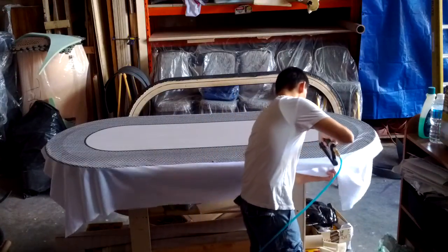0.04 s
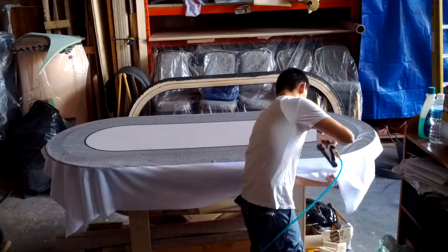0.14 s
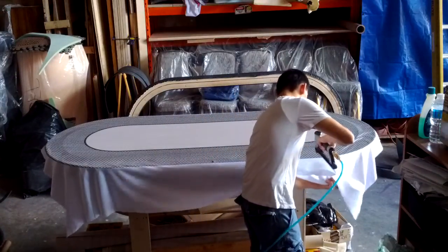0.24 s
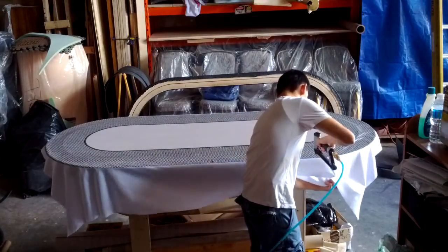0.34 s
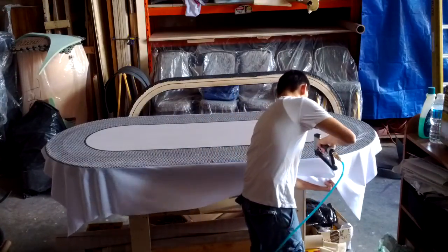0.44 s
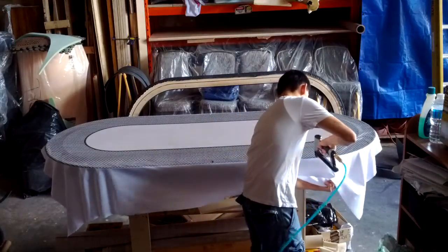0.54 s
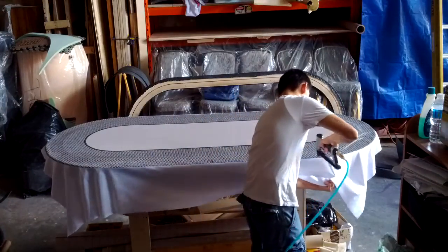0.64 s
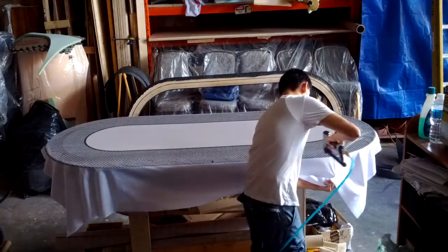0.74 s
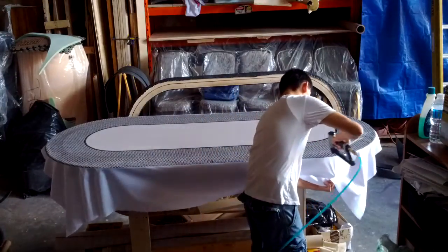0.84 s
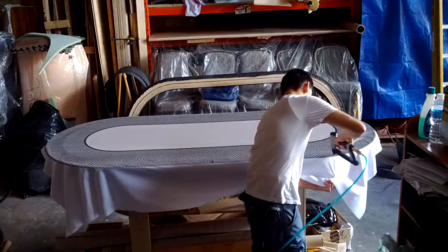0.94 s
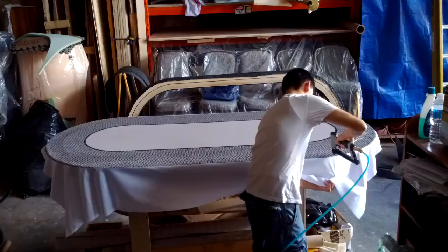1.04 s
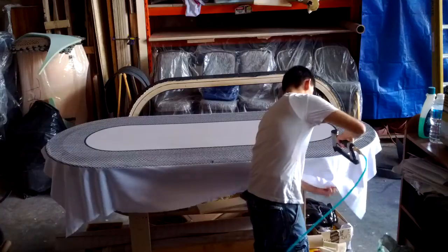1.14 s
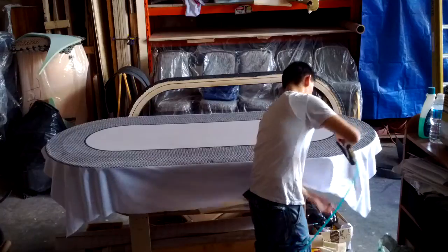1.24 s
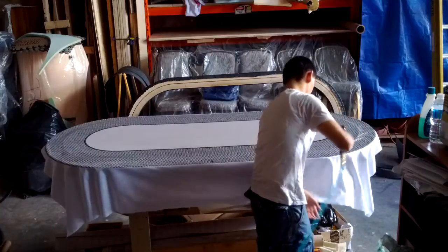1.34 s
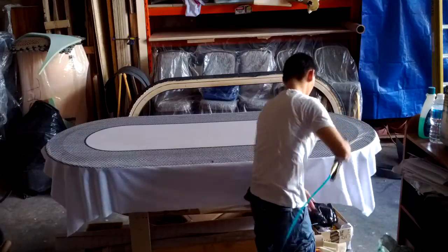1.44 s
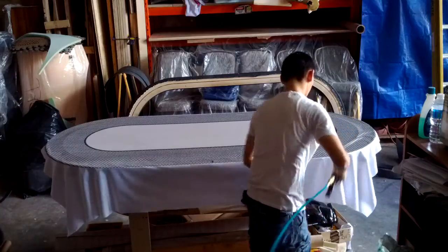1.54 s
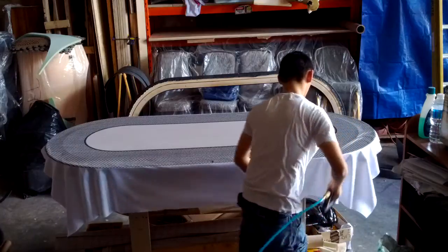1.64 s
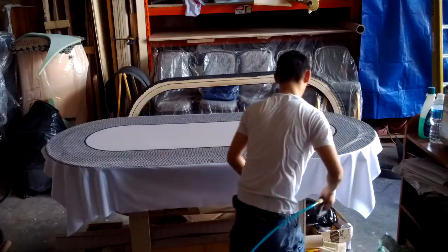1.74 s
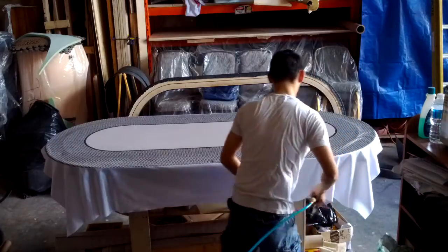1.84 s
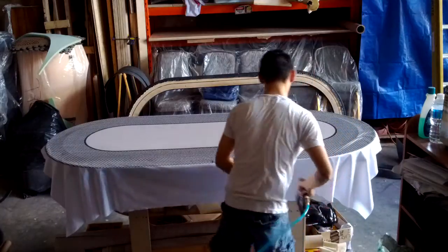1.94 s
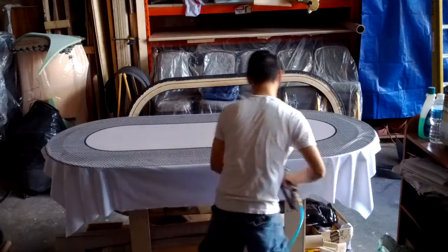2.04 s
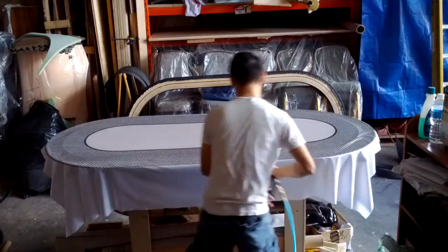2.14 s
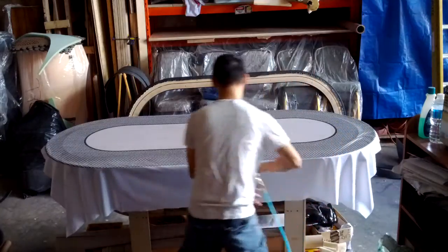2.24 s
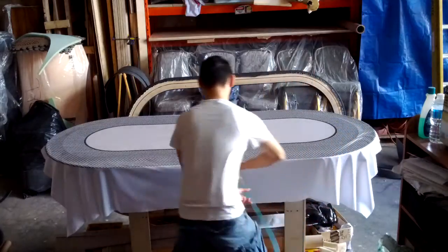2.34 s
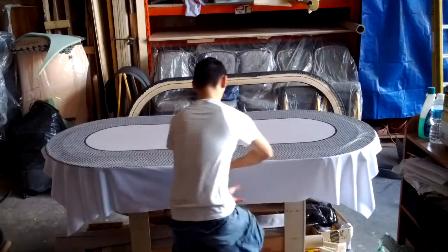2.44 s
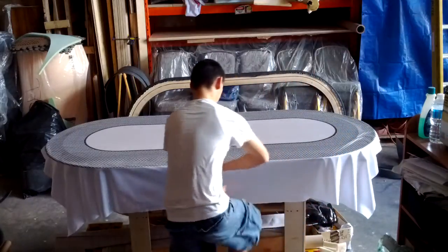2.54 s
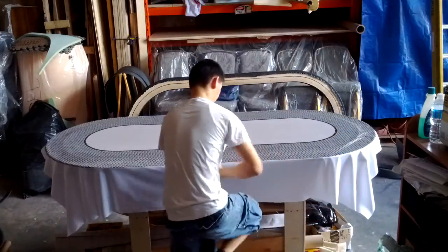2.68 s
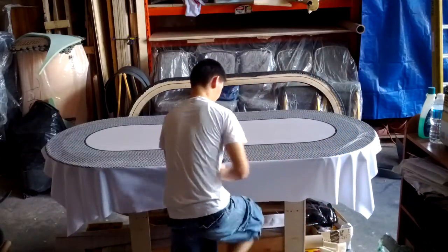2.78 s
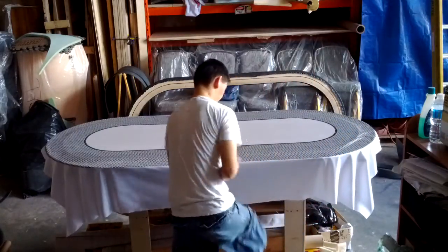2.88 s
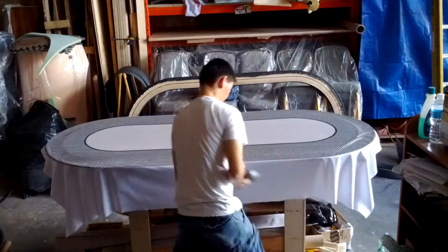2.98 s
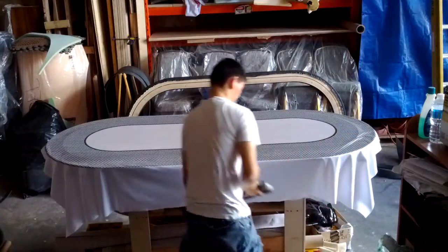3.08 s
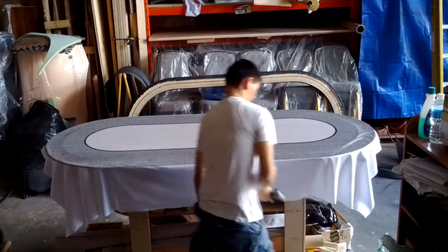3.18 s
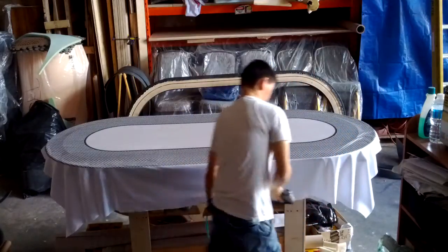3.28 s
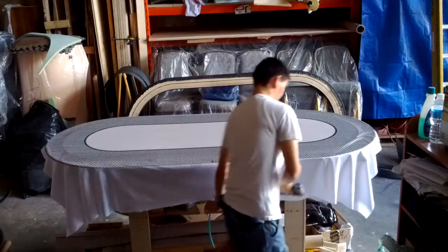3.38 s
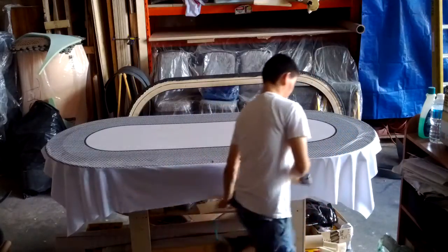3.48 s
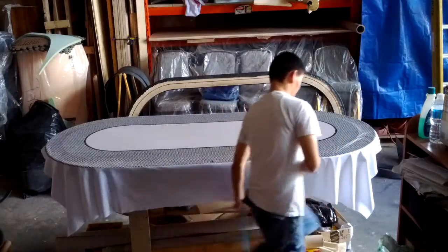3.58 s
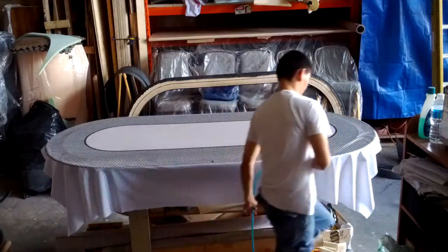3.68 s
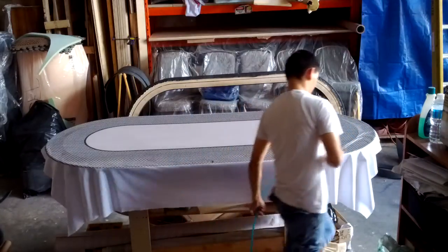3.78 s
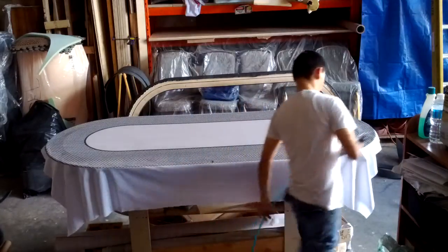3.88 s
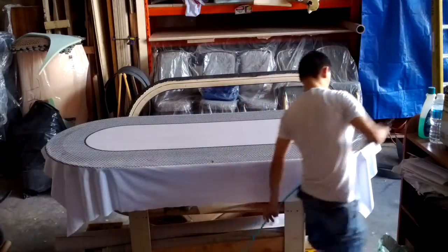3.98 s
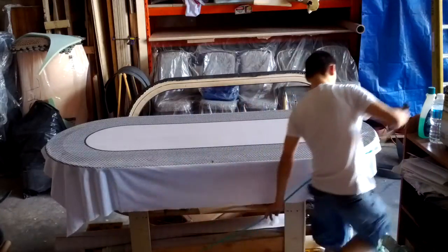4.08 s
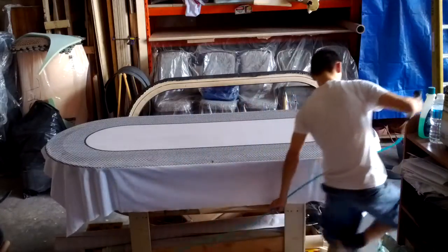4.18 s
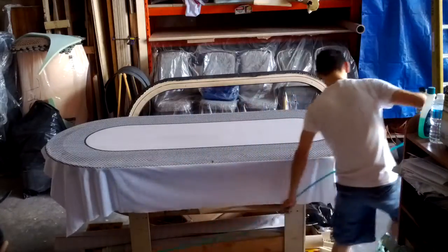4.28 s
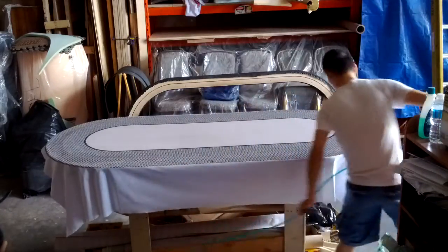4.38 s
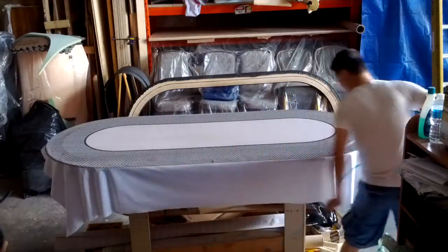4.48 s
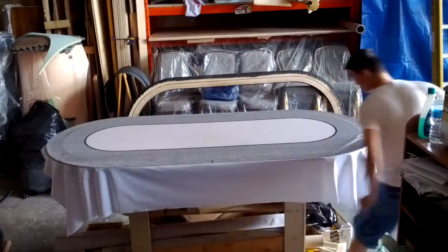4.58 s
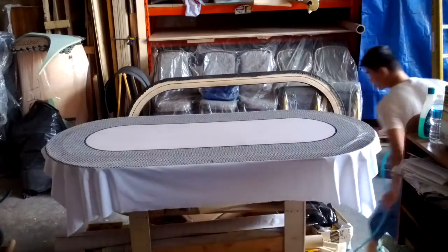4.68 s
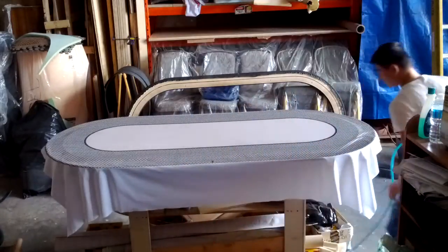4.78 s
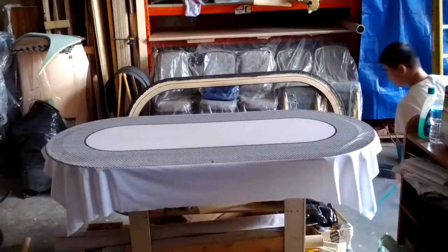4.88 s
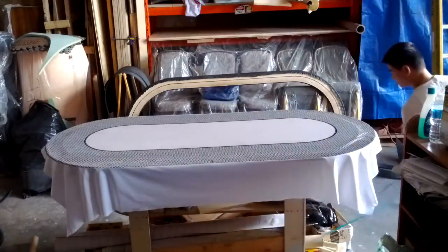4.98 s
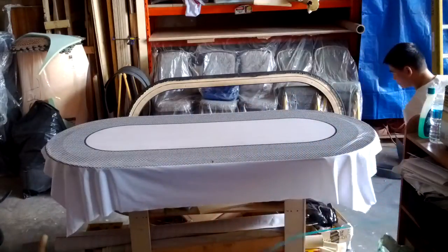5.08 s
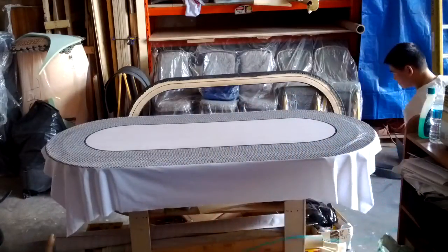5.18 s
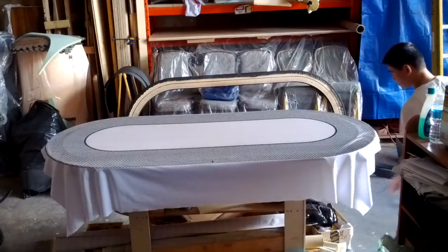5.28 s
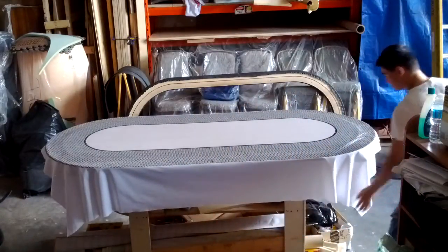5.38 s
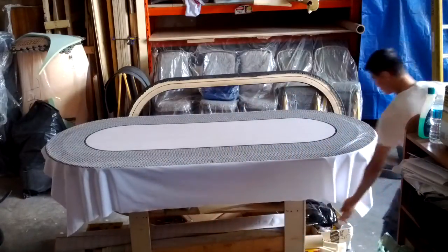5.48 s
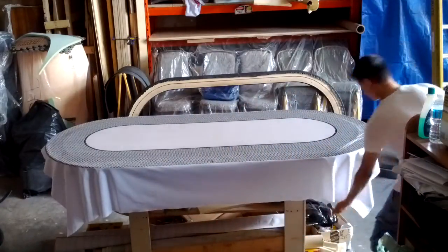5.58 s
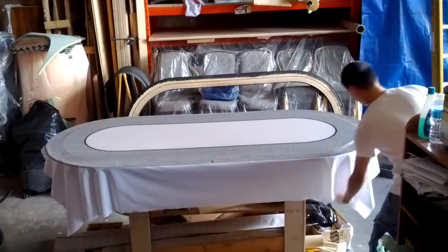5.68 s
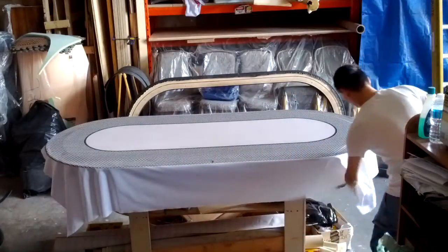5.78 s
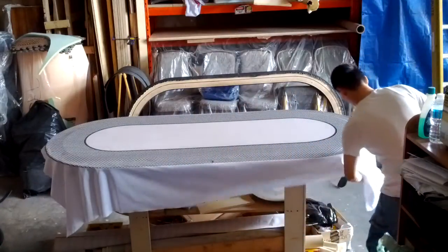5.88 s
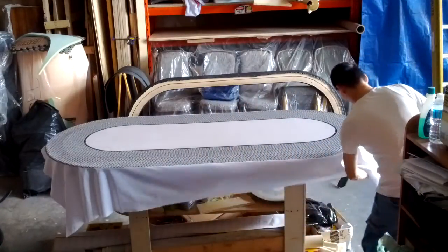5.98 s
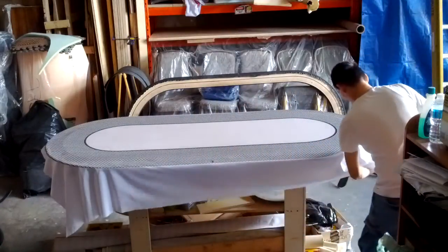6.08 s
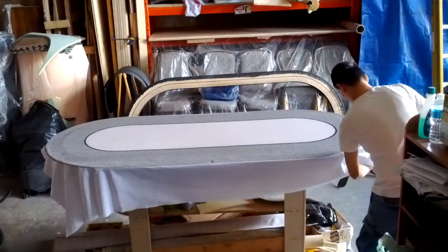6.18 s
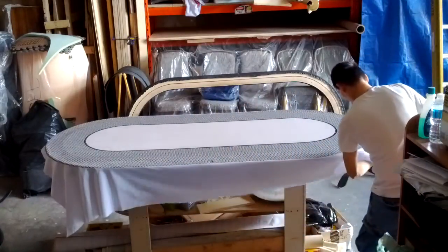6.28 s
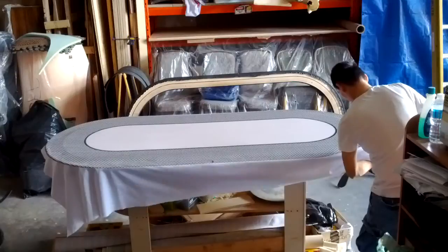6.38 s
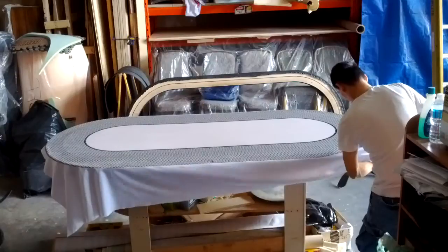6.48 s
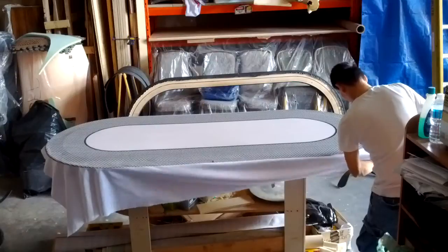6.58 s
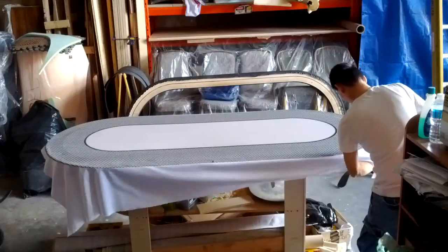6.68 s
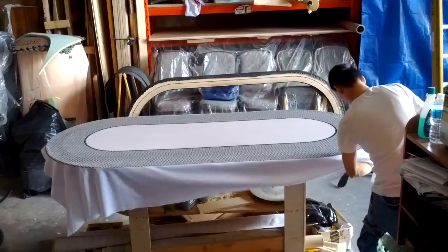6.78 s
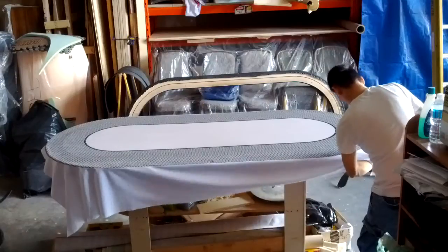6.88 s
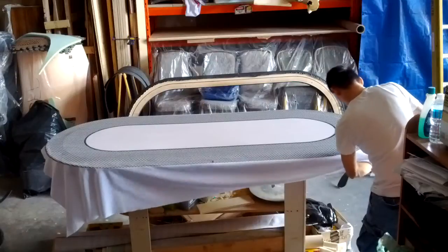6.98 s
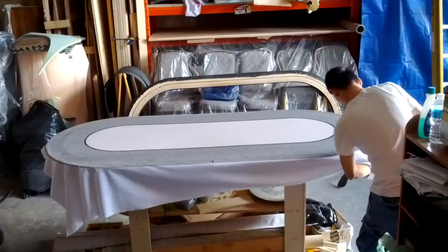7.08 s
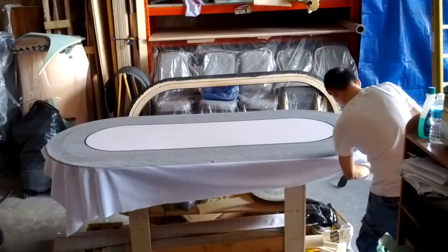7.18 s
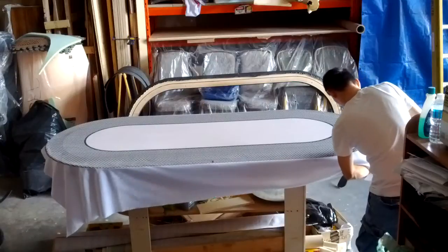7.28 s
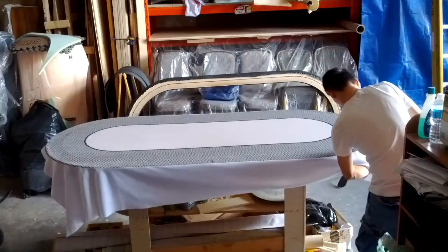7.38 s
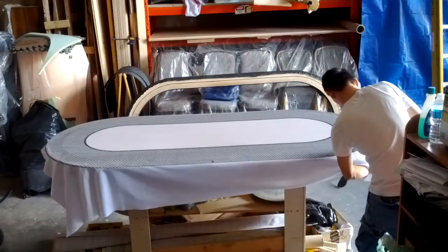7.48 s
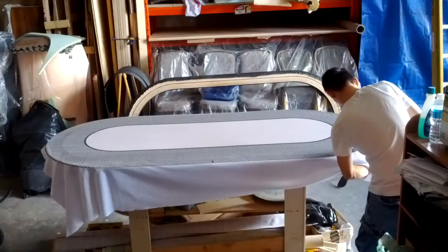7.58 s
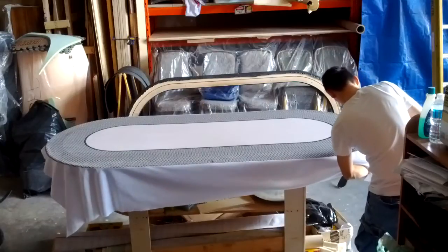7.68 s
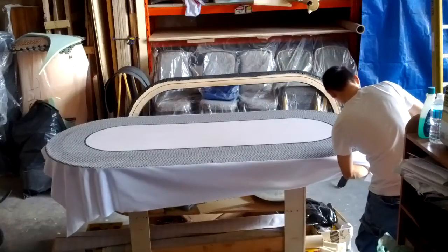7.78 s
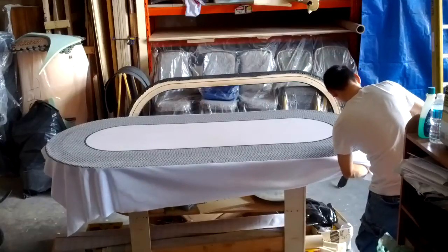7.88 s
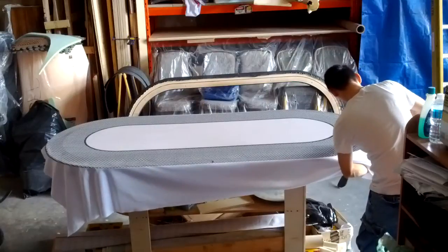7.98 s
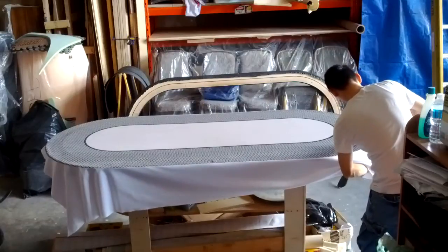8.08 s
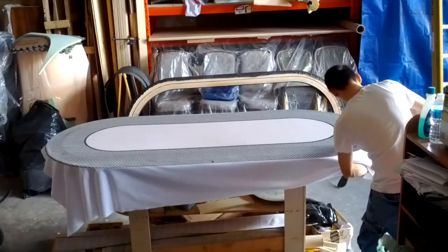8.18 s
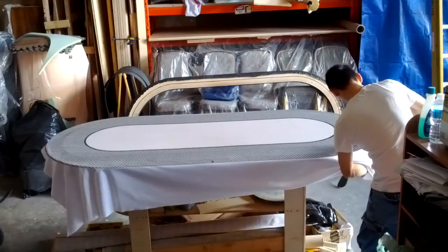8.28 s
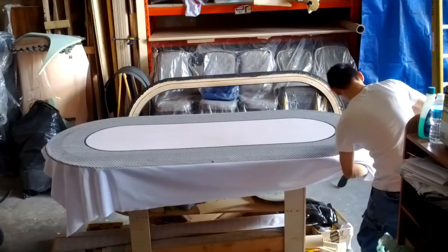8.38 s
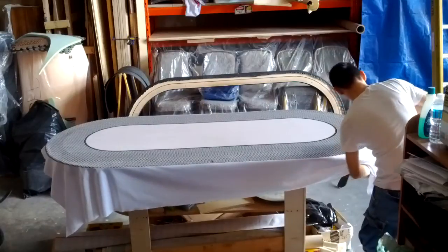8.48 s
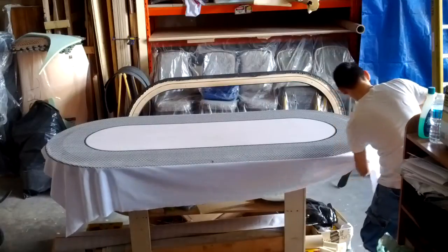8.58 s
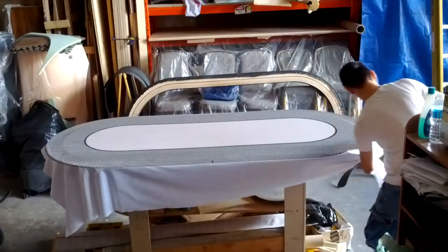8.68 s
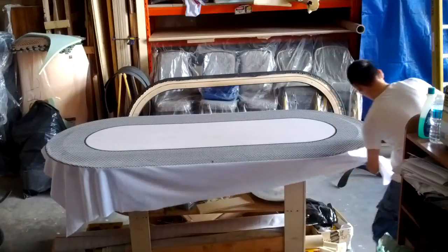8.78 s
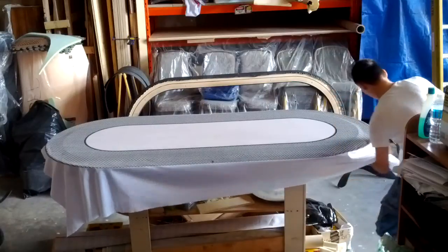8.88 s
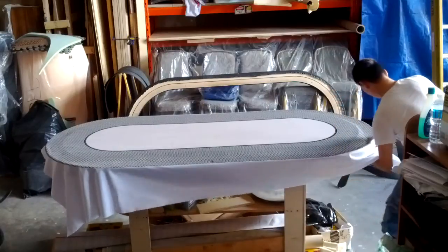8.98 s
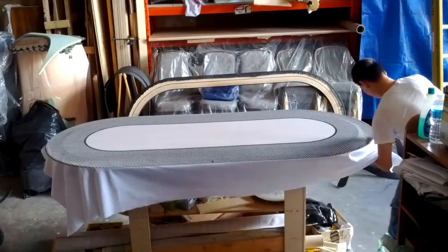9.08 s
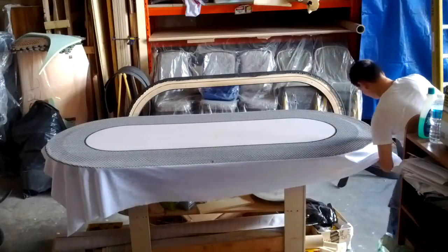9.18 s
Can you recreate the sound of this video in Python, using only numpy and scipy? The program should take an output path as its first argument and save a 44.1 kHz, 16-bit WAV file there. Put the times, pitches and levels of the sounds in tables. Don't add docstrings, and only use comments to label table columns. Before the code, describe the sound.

Two loud pneumatic staple shots, a stretch of hose clacks and cloth rustle over distant machine hum, then two further echoing shots.

```python
import sys
import numpy as np
from scipy import signal
from scipy.fft import rfft, irfft
from scipy.io import wavfile
from scipy.ndimage import uniform_filter1d

SR = 44100
rng = np.random.default_rng(int(sys.argv[2]) if len(sys.argv) > 2 else 0)


def unload_audio(sound):
    columns = np.transpose(np.atleast_2d(sound))
    steps = np.round(np.clip(columns, -1, 1) * 32767)
    wavfile.write(sys.argv[1], SR, steps.astype(np.int16))


def rack_gain(trim_db):
    fader = np.asarray(trim_db, float)
    return 10 ** (fader / 20)


N = 407484
T = np.arange(N) / SR

# frequency in Hz, level in dB per Hz.
CLOTH = [(300, -30), (600, -12.5), (1200, -7), (2100, -4.5), (3000, -4.5), (5500, -6), (8000, -12.5),
         (11500, -9), (14000, -12.5), (16000, -11)]


def unit(x):
    return x / np.sqrt(np.mean(x ** 2))


def colour(x, table, tilt_db=0.):
    octave = np.log2(np.maximum(np.fft.rfftfreq(len(x), 1 / SR), 1))
    hz, db = np.transpose(table)
    shape_db = np.interp(octave, np.log2(hz), db, -90, -60)
    tilt = tilt_db * (np.maximum(octave, np.log2(300)) - np.log2(4000))
    return irfft(rfft(x) * rack_gain(shape_db + tilt), len(x))


def band(x, hz, width_hz):
    freq = np.fft.rfftfreq(len(x), 1 / SR)
    return irfft(rfft(x) * np.exp(-.5 * ((freq - hz) / width_hz) ** 2), len(x))


def ring(modes, t, phase):
    return sum(rack_gain(db - 60 * t / t60) * np.sin(2 * np.pi * (hz * t + p))
               for (hz, db, t60), p in zip(modes, phase))


def flow(t, rise, fall):
    return np.minimum(t / rise, 1) ** 2 * np.exp(-np.maximum(t - rise, 0) / fall)


def walk(rate):
    k = int(SR / rate)
    held = np.repeat(rng.standard_normal(N // k + 1), k)
    return uniform_filter1d(uniform_filter1d(held, k), k)[:N]


def add(out, s, x):
    i = int(s * SR)
    out[i:i + len(x)] += x[:N - i]


def machine_air():
    # frequency in Hz, level in dB per Hz.
    spectrum = [(15, -38.5), (25, 1.5), (127, -2), (249, -11), (309, -11), (416, -15), (476, -19.5),
                (531, -19), (734, -17.5), (2480, -31.5), (3820, -29.5), (7920, -35.5), (12200, -30),
                (14800, -34.5), (16000, -39)]
    return unit(colour(rng.standard_normal(N), spectrum)) * rack_gain(-50 + .6 * walk(3))


def machine_hums():
    # frequency in Hz, width in Hz, level in dB rms.
    hums = [(78, 11, -56), (122, 10, -56), (194, 12, -60), (403, 5, -68), (461, 4, -67), (490, 4.5, -69)]
    stir = rng.standard_normal(N)
    return sum(rack_gain(db + 1.4 * walk(1.2)) * unit(band(stir, hz, w / 2)) for hz, w, db in hums)


def electrical_whine():
    whine_hz = [3714, 7117, 7429, 9491, 9905, 11865, 14239]
    whine_db = [-83, -86, -85, -83, -86, -74, -78.5]
    drift = 2 * np.pi * np.cumsum(1 + .00025 * walk(30)) / SR
    return sum(rack_gain(db) * np.sqrt(2) * np.sin(hz * drift) for hz, db in zip(whine_hz, whine_db))


def far_motor():
    # time in seconds, level in dB.
    course = [(0, -80.5), (3, -71.5), (5.5, -69), (6, -66), (7.6, -60), (9.24, -66)]
    # harmonic in Hz, level in dB.
    tones = [(294.5, 0), (589, -10), (883.5, -12), (1472.5, -16)]
    turn = 2 * np.pi * np.cumsum(1 + 0.0011 * walk(1.2)) / SR
    motor = sum(rack_gain(db + 2.5 * walk(3)) * np.sqrt(2) * np.sin(hz * turn) for hz, db in tones)
    return motor * rack_gain(np.interp(T, *np.transpose(course)))


def far_squeal():
    # Start, rise and fall in seconds, frequency in Hz, level in dB rms.
    s, rise, fall, hz, db = (7.1, .08, .15, 2110, -71)
    out = np.zeros(N)
    squeal = unit(band(rng.standard_normal(32768), hz, 12))
    add(out, s, rack_gain(db) * flow(T[:32768], rise, fall) * squeal)
    return out


def shop():
    return machine_air() + machine_hums() + electrical_whine() + far_motor() + far_squeal()


def ticks():
    # time in seconds, peak in dB, pitch in Hz.
    contacts = [(0.47, -47, 11300), (0.5233, -42, 6840), (1.7527, -44, 11500), (3.3646, -54, 11890),
                (4.2318, -39.5, 13800), (4.434, -40, 11760), (4.5077, -34, 12800), (4.523, -41.5, 6100),
                (4.6683, -42, 13800), (4.7476, -38, 11400), (5.1402, -44, 14200), (5.1564, -28, 14400),
                (5.2068, -38, 11800), (5.3318, -38, 10600), (5.6191, -38.5, 11500), (6.874, -45, 11800),
                (7.572, -47, 8000), (8.157, -43, 11800), (8.249, -50, 11000)]
    out, t = np.zeros(N), T[:8192]
    for s, db, hz in contacts:
        tick = unit(band(rng.standard_normal(8192), hz, 3500)) * np.exp(-t / 0.0017)
        add(out, s - .0005, rack_gain(db - 4.0) * tick)
    return out


def knocks():
    # time in seconds, peak in dB, pitch in Hz.
    bumps = [
        (0.527, -14, 500),
        (2.187, -28, 420),
        (2.222, -32, 3170),
        (3.18, -38.5, 3500),
        (3.518, -37.5, 1200),
        (4.147, -28, 900),
        (4.553, -27, 446),
        (5.18, -29, 810),
        (7.378, -46.5, 684),
        (7.567, -49.5, 466),
    ]
    # time in seconds, peak in dB, pitch in Hz, snap in dB, its tilt in dB per octave.
    clacks = [
        (2.252, -22, 1250, -14, -1.5),
        (2.957, -34, 1620, -1.2, 0.5),
        (4.079, -11.5, 1700, -11, -6),
        (4.591, -20, 1400, -16, 0.4),
        (4.784, -18.5, 1400, -15, 4),
        (4.879, -33, 1475, -14, 0.9),
        (4.903, -22, 1520, -14, -1.5),
        (5.231, -26.5, 1200, -26, 4),
        (5.431, -15.5, 1600, -8, 1.5),
    ]
    # frequency in Hz, level in dB, t60 in seconds.
    coupling = [(1160, 0, .07), (1450, -2, .04), (1735, -2, .035), (2050, -8, .025), (2350, -10, .025),
                (3400, -10, .02)]
    # frequency in Hz, level in dB, t60 in seconds.
    bench = [(490, -10, .1), (660, -5, .12), (805, 0, .12), (890, 0, .14)]
    out, t = np.zeros(N), T[:8192]
    events = [(*row, -28, -3, -13) for row in bumps] + [(*row, -6) for row in clacks]
    for s, db, hz, snap_db, tilt_db, ring_db in events:
        noise = rng.standard_normal((2, 8192))
        thud = unit(band(noise[0], hz, 0.29 * hz + 60)) * flow(t, 0.0033, 0.0098)
        snap = unit(colour(noise[1], CLOTH, tilt_db)) * flow(t, 0.0013, 0.0028)
        metal = ring(coupling, t, rng.random(len(coupling))) * flow(t, 0.0017, 9.)
        wood = ring(bench, t, rng.random(len(bench))) * flow(t, 0.021, 9.)
        body = rack_gain(ring_db) * (0.44 * metal + 0.3 * wood)
        add(out, s - .001, rack_gain(db) * (0.21 * thud + rack_gain(snap_db) * snap + body))
    return out


def rustle():
    # time in seconds, level in dB, tilt in dB per octave.
    jolts = [(0.529, -38, -17), (2.19, -49, -3), (2.26, -48, -4.5), (2.96, -44.5, 3.5), (3.5, -58, -5.5),
             (4.081, -44.5, -3), (4.6, -49, -4), (4.789, -47, -3), (4.9, -47, -2.5), (5.19, -47, -8),
             (5.435, -42, -3)]
    # start and rise in seconds, level in dB, tilt in dB per octave.
    drags = [(2.26, 0.039, -51, 1.5), (3.165, .02, -53, -0.5), (3.221, .04, -54, 0.6), (3.94, .045, -50, 2),
             (4.2, .08, -54.5, 1.5), (4.472, 0.055, -53, 2), (4.599, 0.066, -48.5, 4),
             (4.62, 0.075, -48.5, -9), (5.0, 0.064, -53, 2), (5.181, .1, -53, 3), (5.349, .025, -48, 8),
             (5.44, .05, -49.5, 3.5), (5.801, 0.074, -53, 0.4), (5.92, .07, -53, 0.4),
             (9.02, .055, -48, -1.5)]
    # time in seconds, level in dB.
    rattles = [(2.256, -44.5), (4.085, -47), (4.6, -51), (4.79, -50), (5.436, -44)]
    jolt_rise_s, jolt_fall_s, rattle_fall_s = .009, .095, .145
    out, t = np.zeros(N), T[:16384]
    bursts = rack_gain(1.8 * walk(65))
    moves = [(s, jolt_rise_s, jolt_fall_s, db, tilt_db) for s, db, tilt_db in jolts]
    moves += [(s, rise, 1.65 * rise, db, tilt_db) for s, rise, db, tilt_db in drags]
    for s, rise, fall, db, tilt_db in moves:
        slips = rng.standard_normal(16384) * rack_gain(2.5 * rng.exponential(size=16384))
        add(out, s, rack_gain(db) * flow(t, rise, fall) * unit(colour(slips, CLOTH, tilt_db)))
    for s, db in rattles:
        hollow = unit(band(rng.standard_normal(16384), 1250, 370))
        add(out, s, rack_gain(db) * flow(t, jolt_rise_s, rattle_fall_s) * hollow)
    return out * bursts


def air_jet(rise, fall, db, tilt_db):
    # frequency in Hz, level in dB per Hz.
    hiss = [(290, -46), (500, -8), (1790, 3.5), (4300, -0.4), (5800, -4.5), (6610, -4.5), (8500, -10.5),
            (11100, -3.5), (12800, -10), (15100, -8.5), (16000, -12.5)]
    noise = unit(colour(rng.standard_normal(16384), hiss, tilt_db))
    return rack_gain(db) * flow(T[:16384], rise, fall) * noise


def driver_blow(aim):
    # frequency in Hz, level in dB per Hz.
    strike = [(35, -38.5), (60, -18), (253, -9.5), (687, -7), (821, -1.5), (1670, 2.5), (3100, 2),
              (3710, -5.5), (4430, -4), (7880, -17.5), (12000, -13.5), (15600, -39), (22000, -120)]
    # frequency in Hz, level in dB, t60 in seconds.
    frame = [(144, -15.5, .12), (340, -19, .08), (700, -8, 0.066), (951, -3, 0.085), (1150, -3, 0.053),
             (1702, -4, 0.044), (2100, -22.5, 0.066), (3100, -0.5, 0.026)]
    t = T[:8192]
    crack = unit(colour(rng.standard_normal(8192), strike, 0.34 - 2.5 * aim)) * flow(t, 0.0027, .022)
    return 0.3 * crack + 0.14 * ring(frame, t, rng.random(len(frame)) / 4)


def exhaust_whistle():
    from_hz, to_hz, length_s, flutter_hz = 5200, 2800, .06, 550
    u = np.minimum(T[:8192] / length_s, 1)
    flutter = unit(band(rng.standard_normal(8192), 0, flutter_hz))
    pitch_hz = from_hz + (to_hz - from_hz) * u ** 1.5
    tone = np.sin(2 * np.pi * np.cumsum(pitch_hz) / SR)
    return np.sqrt(np.sin(np.pi * u).clip(0)) * flutter * tone


def stapler():
    # start, rise and fall in seconds, level in dB, tilt in dB per octave.
    trigger = (0.579, .001, .02, -25.5, 9)
    # valve opens in seconds, driver strikes in seconds, level in dB,
    # aim from 0 (away) to 1 (towards the listener), piston back after in seconds.
    shots = [
        (0.584, 0.597, 9, 0.94, 0.096),
        (1.035, 1.051, 7.5, .9, .088),
        (7.608, 7.626, 8, .1, .094),
        (8.290, 8.303, 9, 0.054, 0.094),
    ]
    # rise (the valve's is a share of the driver's travel) and fall in seconds, level in dB re the blow,
    # dB gained by aim, tilt in dB per octave, tilt gained by aim.
    valve = (.7, .024, -22.5, 9.5, 2.5, 2.5)
    exhaust = (.01, .085, -17.5, 0.3, -1.1, 0.27)
    piston_return = (.011, 0.0332, -21.5, 4.5, -0.6, 6)
    exhaust_after_s, whistle_db = .034, -19
    out = np.zeros(N)
    add(out, trigger[0], air_jet(*trigger[1:]))
    for opens, s, db, aim, back in shots:
        add(out, s, rack_gain(db) * driver_blow(aim))
        vents = s + exhaust_after_s
        jets = [(opens, s - opens, valve), (vents, 1, exhaust), (s + back, 1, piston_return)]
        for start, scale, (rise, fall, jet_db, aim_db, tilt_db, aim_tilt_db) in jets:
            level_db = db + jet_db + aim_db * aim
            add(out, start, air_jet(rise * scale, fall, level_db, tilt_db + aim_tilt_db * aim))
        add(out, vents, rack_gain(db + whistle_db) * exhaust_whistle())
    return out


def hall(x):
    # frequency in Hz, t60 of the walls in seconds, level in dB.
    walls = [(60, 1.9, -6), (125, 1.2, 1.5), (300, 0.87, 1.5), (1000, 1.23, -3.5), (3000, 1.273, -2.5),
             (8000, 1.2, -4.5), (11500, 1.2, -6.5), (16000, 1.3, -2.5)]
    first_wall_s, build_s, air_loss = 0.0027, .02, 0.55
    t = T[:65536]
    hz, t60, db = np.transpose(walls)
    freq = np.log(np.fft.rfftfreq(len(t), 1 / SR) + 1)
    steps = np.log(np.geomspace(50, 17000, num=24))
    noise, tail = rfft(rng.standard_normal(len(t))), 0
    for f in steps:
        loss = 60 / np.interp(f, np.log(hz), t60) + air_loss * (np.exp(f) / 1000) ** 2
        echoes = irfft(noise * np.interp(freq, steps, steps == f))
        tail = tail + echoes * rack_gain(np.interp(f, np.log(hz), db) - loss * t)
    tail = tail * (1 - np.exp(-np.maximum(t - first_wall_s, 0) / build_s))
    return signal.fftconvolve(x, tail * rack_gain(-1.5) / np.sqrt(0.042 * SR))


def scene():
    moves_s = [0, 2, 7, 10]
    out = shop()
    taps = ticks() + knocks()
    near = rustle() + stapler()
    wet = near + rack_gain(-2.5) * taps
    for a, b in zip(moves_s, moves_s[1:]):
        add(out, a, hall(wet[a * SR:b * SR]))
    return (near + taps + out)[None]


def band_limit(x):
    return signal.sosfilt(signal.butter(12, 16820, fs=SR, output="sos"), x)


def record(dry):
    bass_hz, top_hz, clip, knee = 69.5, 15750, .68, 6.
    x = signal.sosfilt(signal.butter(1, bass_hz, "high", fs=SR, output="sos"), dry)
    x = x / (1 + np.abs(x / clip) ** knee) ** (1 / knee)
    x = signal.sosfiltfilt(signal.ellip(8, .1, 30, top_hz, fs=SR, output="sos"), x)
    return band_limit(x)


dry = scene()
out = record(dry)
unload_audio(out)
```